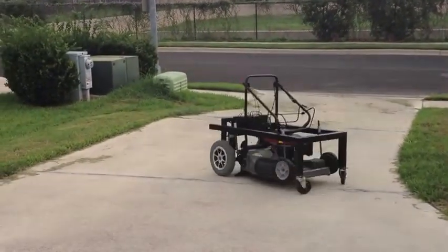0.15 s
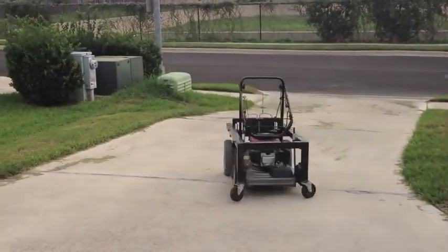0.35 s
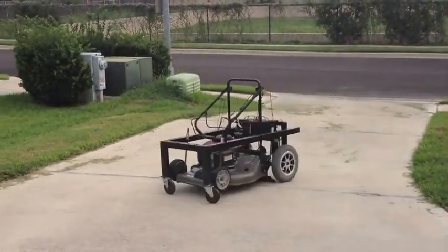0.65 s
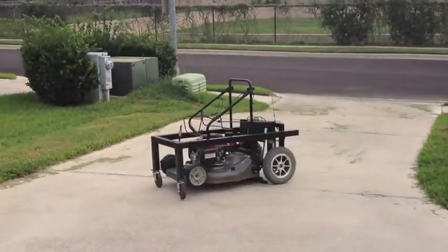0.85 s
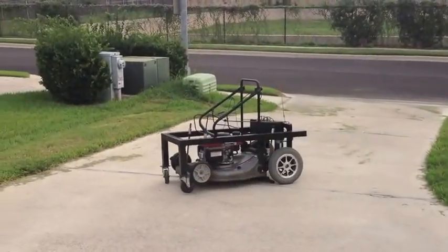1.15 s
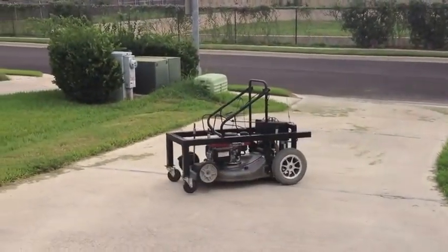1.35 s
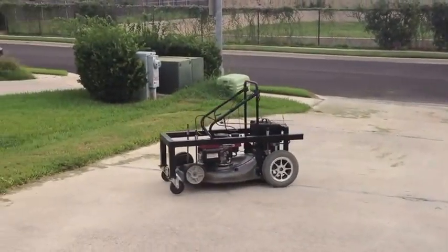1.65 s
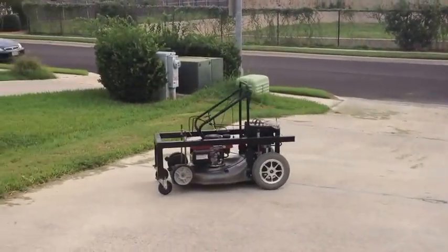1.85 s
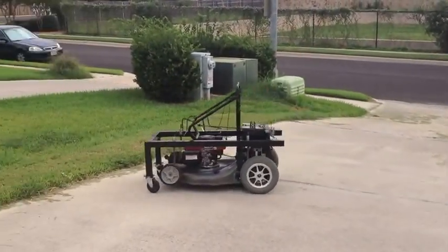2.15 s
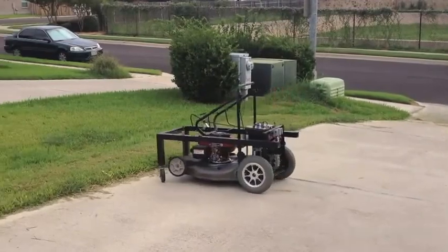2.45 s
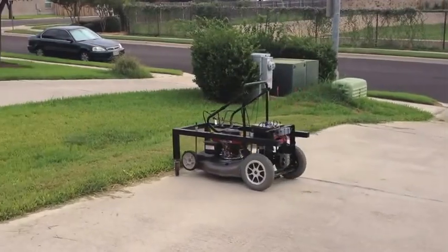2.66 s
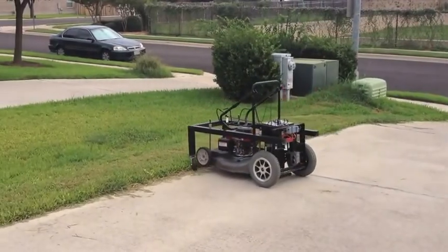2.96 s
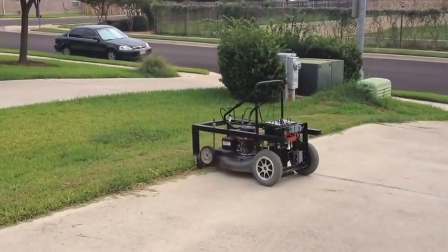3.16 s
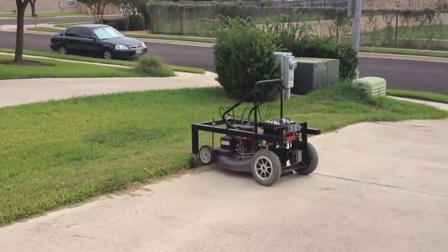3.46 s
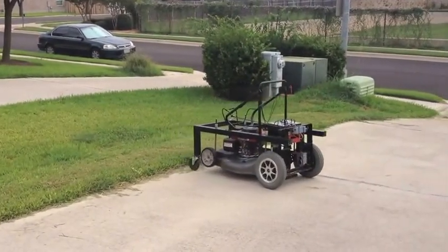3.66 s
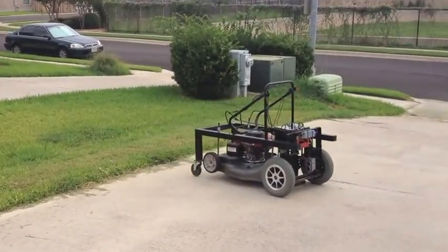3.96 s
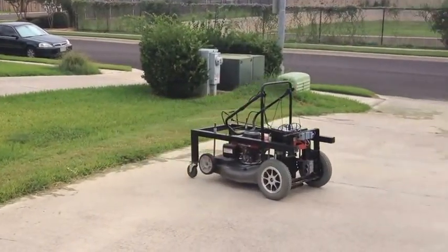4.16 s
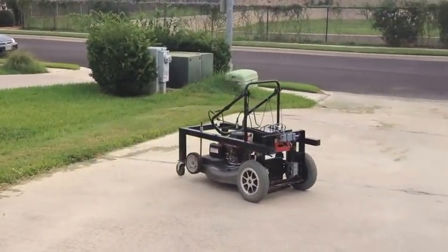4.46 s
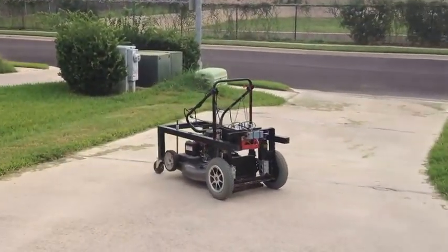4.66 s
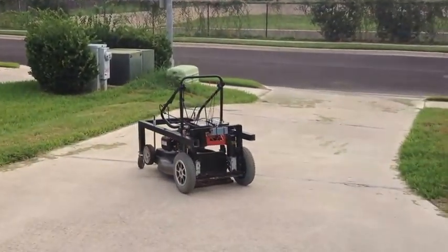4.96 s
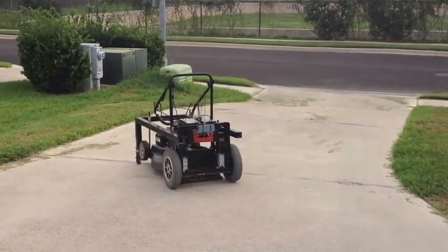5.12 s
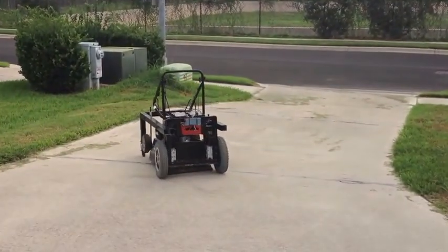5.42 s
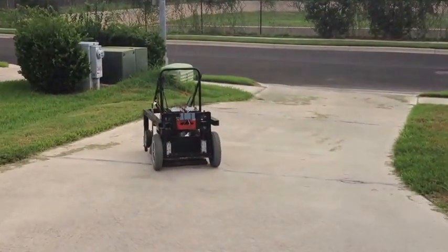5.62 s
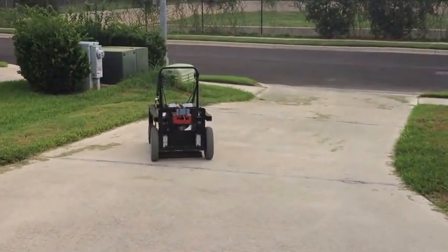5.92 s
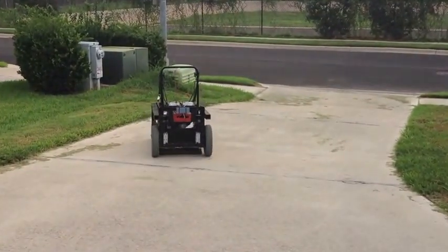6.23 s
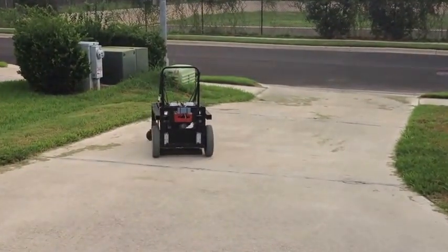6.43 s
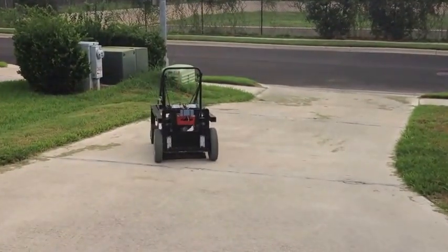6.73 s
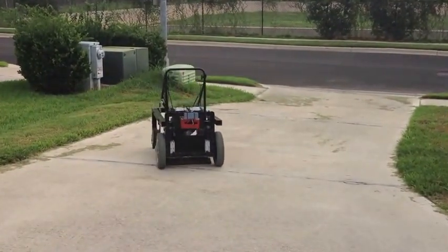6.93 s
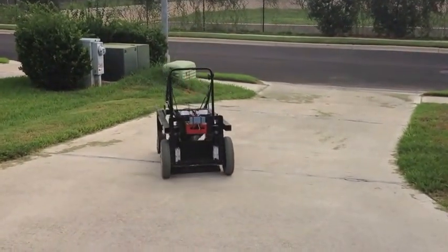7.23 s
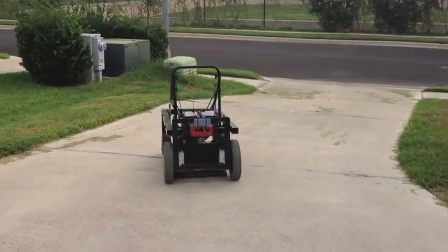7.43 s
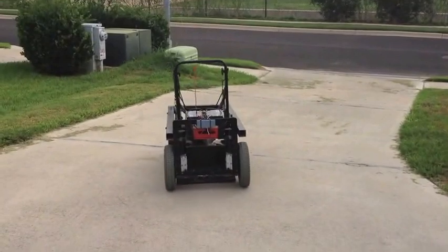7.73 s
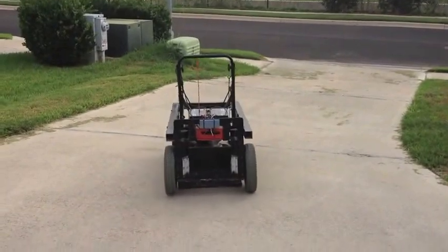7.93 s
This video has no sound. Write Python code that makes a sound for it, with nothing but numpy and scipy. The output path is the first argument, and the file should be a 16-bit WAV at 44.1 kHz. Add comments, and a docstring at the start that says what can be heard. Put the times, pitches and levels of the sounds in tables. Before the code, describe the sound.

A remote-controlled mower cart whirs and rattles over concrete, its steel frame clanking and its casters clacking as it speeds up and slows.

```python
"""Mower cart on a concrete driveway

A remote-controlled cart on two electric wheel motors drives, turns and backs up. The faster it runs,
the more the gears whir, the tyres drum on the deck and loose parts rattle. Jolts make the steel frame
clank and bounce, and the casters clack as it reverses. Behind it lies a quiet suburban hush;
a small camera microphone hollows out the treble."""
import sys
import numpy as np
from scipy import signal
from scipy.fft import rfft, irfft, next_fast_len
from scipy.io import wavfile
from scipy.ndimage import map_coordinates

SR = 44100
rng = np.random.default_rng(int(sys.argv[2]) if len(sys.argv) > 2 else 0)


def transcribe(u):
    """Save the signal u as a 16-bit wav file named by the first command-line argument.

    u: samples, shape (n,) or (channels, n), limited to [-1, 1]; the rate is SR.
    q: integer samples, one column per channel.
    """
    v = np.clip(np.atleast_2d(u).T, -1, 1)
    q = np.round(v * 32767).astype(np.int16)
    wavfile.write(sys.argv[1], SR, q)


N = 356548
RING_T = np.arange(SR // 2) / SR  # time within one hit, t/s

# how hard the cart drives: t/s, deck rumble/dB, treble of gears and loose parts/dB
DRIVE_LEVELS = [(0, -37, -34), (0.33, -36.5, -38.5), (0.46, -47.5, -57), (0.6, -46, -57), (0.76, -38, -47),
                (0.95, -59.5, -65.5), (1.35, -65, -62.5), (1.6, -55.5, -59.5), (2.1, -48.5, -55.5),
                (2.68, -51, -57.5), (2.85, -58.5, -70), (3.44, -63, -69), (3.6, -50, -53), (3.85, -45, -54),
                (4.55, -45, -47.5), (4.86, -52.5, -66), (5.12, -49.5, -63), (5.3, -47.5, -55),
                (5.55, -50.5, -59.5), (5.9, -45.5, -55.5), (6.2, -47.5, -51.5), (6.55, -37.5, -37),
                (6.76, -40, -50), (7.12, -49, -51.5), (7.58, -48.5, -53), (7.72, -48, -56.5),
                (8.08, -43, -44.5)]
# tone of the loose parts: f/Hz, level/dB
RATTLE_EQ = [(60, -59), (250, -43), (700, 3.5), (1100, -1.5), (1700, 11.5), (2100, 10.5), (2480, 11.5),
             (2750, 1), (3300, 9.5), (3900, 13.5), (6000, -5), (15000, -25.5)]
# washers shake on the fast runs: start/s, end/s, level/dB
WASHER_CUES = [(0.1, 0.38, -38), (6.35, 6.65, -35), (7.64, 7.68, -43.5)]
# tone of the washers: f/Hz, level/dB
WASHER_EQ = [(300, -50), (1500, -23), (3100, -25), (3700, 2), (3900, 1), (4200, -11.5), (5000, -14),
             (7500, -6.5), (10000, -20), (11800, -9.5), (14000, -21)]
def rolling():
    """Rough concrete drums the deck and shakes loose parts, the more the faster the cart runs."""
    rumble_db, treble_db = curves(DRIVE_LEVELS)
    lumps_db = 2 * wobble(20)  # slow swells in the rumble
    rumble = amp(rumble_db + 1.5 + lumps_db) * unit(deck(taps(per_s=500, scatter_db=6, crack_db=6)))
    pace_db = treble_db + 37  # about 0 on a fast run
    rattle = unit(coloured(taps(per_s=190, scatter_db=6, crack_db=8), RATTLE_EQ))
    washers = unit(coloured(taps(per_s=120, scatter_db=13, crack_db=2.5), WASHER_EQ))
    shaking = fades(WASHER_CUES, rise_db_per_s=260, fall_db_per_s=260)
    return rumble + amp(-34 + 1.002 * pace_db) * rattle + shaking * washers


# tone of the gears: f/Hz, level/dB
GEAR_EQ = [(40, -56), (300, -29), (900, -6.5), (1600, 16.5), (2400, -9), (2800, 5), (3700, 11), (6000, 2),
           (15000, -10.5)]
# thin, airy motor whine: start/s, end/s, level/dB
WHINE_CUES = [(3.7, 4.5, -64.5), (5.35, 5.95, -65.5), (6.8, 7.5, -60), (7.85, 8.08, -61.5)]
# a gearbox sings softly at creeping speed: start/s, end/s, level/dB
GEARBOX_CUES = [(0.75, 1.15, -54.5), (4.8, 5.0, -59)]
# the loaded motors drone in the deck: start/s, end/s, level/dB
HUM_CUES = [(1.48, 1.51, -47), (2.12, 2.18, -47), (2.52, 2.63, -45)]
def motors(hum_hz=229, hum_wander=0.029):
    """Gear noise rough with meshing teeth, a thin whine, a gearbox note and an unsteady hum under load."""
    _, treble_db = curves(DRIVE_LEVELS)
    whir_db = np.minimum(treble_db + 2, -47.5)  # tops out at full speed
    meshing = rng.standard_normal(N) * amp(3.8 * wobble(320))
    whir = amp(whir_db) * unit(coloured(meshing, GEAR_EQ))
    whine = fades(WHINE_CUES) * fuzzy_tone(hz=11700, width_hz=3400)
    gearbox = fades(GEARBOX_CUES) * fuzzy_tone(hz=1630, width_hz=380)
    flutter = amp(6.4 * wobble(25.3))
    hum_phase = 2 * np.pi * np.cumsum(hum_hz * (1 + hum_wander * wobble(40))) / SR
    hum = fades(HUM_CUES) * unit(flutter * np.sin(hum_phase))
    return whir + whine + gearbox + hum


# jolts to the frame: t/s, clank/dB, thud/dB, sharp edge/dB, small-part jangle/dB, loss per bounce/dB
JOLT_HITS = [(0.09, -6.5, -28, -18, -9.5, 17), (0.115, -6.5, -26.5, -13, -2.5, 4),
             (0.2097, -13.5, -30.5, -4, 2.5, 4.5), (0.3223, -11.5, -24, -14, -4.5, 13),
             (0.407, -22.5, -28.5, -15, 4.5, 18), (0.5532, -30, -35.5, -22, 0, 15),
             (0.599, -21.5, -41, -2, -8, 16), (0.6266, -8.5, -37, -12, -9, 10),
             (0.6362, -5.5, -27, -14, -5, 9), (0.7401, -19, -35.5, -28, 1, 11.5),
             (0.8272, -23.5, -40, -47, -2, 7), (1.2249, -20.5, -30.5, -24, -3.5, 20),
             (1.4402, -14.5, -31, -28, 1.5, 24), (2.4948, -33.5, -40, -27, -2, 8),
             (2.6187, -25, -36, -19, -4, 18), (2.673, -27.5, -50, -13, -2, 5.5),
             (2.906, -47.5, -59, -28, 6, 20), (4.0907, -30.5, -39, -15, -1, 5),
             (4.4251, -28.5, -35.5, -18, -1, 17), (4.5034, -11, -26, -19.5, 1.5, 5.5),
             (4.6555, -10, -25, -10, -2.5, 7), (5.238, -29.5, -39, -18, 0, 10),
             (5.2738, -26, -31.5, -14, -1, 16), (5.796, -29.5, -39.5, -12, -1, 20),
             (5.817, -27, -40, -12, 1.5, 12), (6.2507, -30, -35.5, -6, 6.5, 4),
             (6.329, -25, -32, -27, 7, 2.5), (6.4089, -33, -29, -14, 11, 8), (6.455, -29, -29, -5, 14, 3),
             (6.5611, -16.5, -27, -13, 2, 1), (6.6767, -20, -30.5, -30, -10, 20),
             (7.6491, -25, -30, -25, 9, 21), (7.687, -22, -26.5, -7, 0, 19),
             (7.7668, -23.5, -34, -11, 4.5, 7)]
def jolts(first_flight_s=0.035, flight_shrink=0.85):
    """The jolted frame lands three times, each bounce shorter and weaker; the casters barely ring."""
    out = np.zeros(N + SR)
    for t, clank_db, thud_db, edge_db, jangle_db, loss_db in JOLT_HITS:
        for bounce in range(3):
            hit = frame_hit(t, clank_db, thud_db, edge_db, jangle_db, caster_db=-11.5)
            add(out, t, amp(-loss_db * bounce) * hit)
            t += first_flight_s * flight_shrink ** bounce
    return out[:N]


# caster clacks, thickest while the cart backs up: t/s, clank/dB, thud/dB, treble/dB
CLACK_HITS = [(0.0478, -19, -46, -38), (2.0164, -40, -53, -66), (2.1422, -25.5, -43, -40),
              (2.1565, -21, -37, -33), (2.4319, -35.5, -57, -71), (2.7195, -30.5, -38, -49),
              (5.0511, -37.5, -50, -56), (5.77, -32.5, -38.5, -56), (6.8694, -32.5, -40, -47.5),
              (6.9445, -31, -37.5, -50), (6.9845, -31.5, -37.5, -57), (7.0523, -27.5, -39.5, -56),
              (7.1669, -32, -38.5, -46), (7.2208, -27, -36.5, -49), (7.2326, -28, -38, -45),
              (7.3092, -30.5, -40.5, -51), (7.3701, -32.5, -39, -46), (7.443, -26.5, -38, -48),
              (7.5373, -29.5, -37, -48), (7.551, -33, -35, -49), (7.6257, -25, -38, -46),
              (7.7378, -24.5, -37, -44), (7.7992, -26, -33.5, -48), (7.8204, -26, -35.5, -51),
              (7.886, -27.5, -40.5, -55), (7.9299, -27.5, -37, -59), (7.9597, -36, -42, -60),
              (8.0127, -26, -35, -54)]
def casters():
    """A caster fork clacks against its stop and rings, and the deck answers with a thud."""
    out = np.zeros(N + SR)
    for t, clank_db, thud_db, treble_db in CLACK_HITS:
        edge_db = treble_db - clank_db + 2
        add(out, t, frame_hit(t, clank_db, thud_db + 1.5, edge_db, jangle_db=-2.5, caster_db=-1))
    return out[:N]


# tone of struck steel: f/Hz, level/dB
STEEL_EQ = [(60, -66), (250, -38), (700, -9.5), (1100, -10), (1750, -1), (2100, -0.5), (2480, 1),
            (2750, -6.5), (3300, 1.5), (3900, 4.5), (6000, -12), (15000, -22.5)]
# ring of the steel frame: f/Hz, level/dB, t60/s
FRAME_MODES = [(1570, -12, .16), (1930, -1, .14), (2360, -3, .19), (2470, -1, .13), (2538, -1, .15),
               (3200, -7, .19), (3290, -6, .16), (3450, -2, .22), (3630, -4, .15), (3715, -5, .18),
               (3820, -4, .2), (4180, -3, .13), (4410, -7, .15), (6910, -15, .13), (7650, -18, .13),
               (8690, -18, .1)]
# ring of a caster fork: f/Hz, level/dB, t60/s
FORK_MODES = [(1622, 7.5, 0.024), (1718, -5, 0.12), (1726, 2, 0.16), (1800, -17, 0.097), (2477, -9, 0.046)]
def frame_hit(t, clank_db, thud_db, edge_db, jangle_db, caster_db, rebound_s=0.0039):
    """One contact and its chatter: the frame clanks, a fork rings, the deck thuds. Levels are relative."""
    times, rumble_db, _ = np.transpose(DRIVE_LEVELS)
    # a slow cart gives one clean clack, a fast one chatters
    chatter = np.clip((np.interp(t, times, rumble_db) + 55.5) / 14, .03, 1.5)
    swell = RING_T / rebound_s * np.exp(1 - RING_T / rebound_s)
    rebounds = rng.random(len(RING_T)) < 600 / SR
    contact = chatter * swell * rebounds * rng.uniform(-0.97, 1, len(RING_T))
    contact[0] = amp(-5.5)  # the first touch
    struck = lambda ring: unit(signal.fftconvolve(contact, ring)[:len(RING_T)])
    steel = struck(coloured(dense_ring(crack_db=4), STEEL_EQ))
    clean_crack = unit(coloured(burst(t60=0.016), STEEL_EQ))
    steel += amp(-9) * max(1 - chatter, 0) * clean_crack
    steel += amp(-6.5) * struck(chime(FRAME_MODES, scatter_db=4.5, detune=0.0025))
    steel += amp(caster_db) * struck(chime(FORK_MODES, scatter_db=3, detune=0.0096))
    top_db = 0.56 * (edge_db + 19)  # harder contact is brighter
    hit_eq = [(70, -28), (500, 0.5), (2800, -1.5), (3800, jangle_db), (5000, -0.5), (7000, top_db)]
    clank = coloured(steel, hit_eq)
    thud = unit(deck(dense_ring(crack_db=-36)))
    return amp(clank_db - 26) * clank + amp(thud_db - 16) * thud


# body of the mower deck: f/Hz, width/Hz, level/dB
DECK_MODES = [(185.6, 4.6, -2), (222, 46.5, 5), (327, 146, -4), (565.5, 123, -3), (648, 92, -10.5),
              (806, 350, -15)]
def deck(x, low_hz=142, high_hz=1300):
    """x through the resonances of the mower deck, which radiates little deep bass."""
    def response(f):
        modes = sum(amp(db) * 1j * f * width / (hz * hz - f * f + 1j * f * width)
                    for hz, width, db in DECK_MODES)
        return modes / (1 + 1j * f / high_hz)
    low_cut = signal.butter(3, low_hz, "high", fs=SR, output="sos")
    return signal.sosfilt(low_cut, filtered(x, response))


# how long the cart rings: f/Hz, t60/s
CART_DECAY = [(150, 0.15), (500, 0.22), (1100, 0.15), (3000, 0.35), (8000, 0.1), (15000, 0.17)]
def dense_ring(crack_db, crack_t60=0.066):
    """A crack, then countless close modes that die band by band; energy 1."""
    hz, t, spectrum = signal.stft(rng.standard_normal(len(RING_T)), SR, nperseg=256)
    decay = amp(-60 * t / along(CART_DECAY, hz)[:, None])
    tail = signal.istft(spectrum * decay, SR, nperseg=256)[1][:len(RING_T)]
    ring = tail * (1 + amp(crack_db - 60 * RING_T / crack_t60))
    return ring / np.linalg.norm(ring)


# a wheel drops into a joint or knocks on its axle: t/s, peak/dB
KNOCK_HITS = [(0.495, -24), (1.967, -34), (2.015, -38), (2.056, -31), (3.787, -36), (3.997, -36),
              (4.348, -35), (5.086, -30.5), (5.181, -33.5), (5.443, -32), (5.678, -26), (5.768, -32),
              (5.853, -34), (7.369, -37)]
# hollow tone of a wheel: f/Hz, level/dB
WHEEL_EQ = [(50, -48), (110, -18), (210, -0.5), (420, -17.5), (640, 3), (900, -12.5), (1500, -24.5),
            (3000, -33), (9000, -50)]
# grit snaps under a tyre: t/s, peak/dB
GRIT_HITS = [(1.2948, -29), (1.3013, -22.5), (1.545, -33), (1.656, -32), (4.608, -16.5), (5.3177, -24.5)]
def tyres():
    """Dull, hollow wheel knocks and the bright snaps of crushed grit."""
    out = np.zeros(N + SR)
    for t, db in KNOCK_HITS:
        knock = coloured(burst(t60=0.046) + .5 * burst(t60=0.035), WHEEL_EQ)
        add(out, t, amp(db) * knock / np.abs(knock).max())
    grit_eq = [(1500, -46), (3400, 0), (4400, 11), (5100, 10), (6500, -17.5), (14000, -21)]
    for t, db in GRIT_HITS:
        snap = coloured(burst(t60=0.0068) + 0.84 * burst(t60=0.028), grit_eq)
        add(out, t, amp(db) * snap / np.abs(snap).max())
    return out[:N]


# tone of the suburban bed: f/Hz, level/dB
STREET_EQ = [(25, -14), (60, -45), (110, 1.5), (170, 9.5), (290, -1), (460, -5), (620, 0), (1550, 3.5),
             (2500, -11.5), (4000, -27), (5300, -12.5), (7500, -20.5), (10000, -28), (15000, -15.5)]
def street():
    """The even hush of distant traffic and leaves."""
    return amp(-51.5 + 2.1 * wobble(3.42)) * unit(coloured(rng.standard_normal(N), STREET_EQ))


def taps(per_s, scatter_db, crack_db, parts=6):
    """Random small contacts, shared among several parts that each ring their own way."""
    out = np.zeros(N)
    for _ in range(parts):
        onsets = rng.random(N) < per_s / parts / SR
        strength = amp(scatter_db * rng.uniform(-0.85, 1, N))
        out += signal.oaconvolve(onsets * strength, dense_ring(crack_db))[:N]
    return unit(out)


def chime(modes, scatter_db, detune):
    """Modes struck at new strengths and pitches: loose parts sit a little differently each time."""
    hz, db, t60 = np.transpose(modes)[:, :, None]
    gain = amp(db + scatter_db * rng.standard_normal(hz.shape)) * rng.choice([-1, 1], hz.shape)
    hz = hz * (1 + detune * rng.standard_normal(hz.shape))
    decay = amp(-60 * RING_T / t60)
    return unit(np.sum(gain * decay * np.sin(2 * np.pi * hz * RING_T), axis=0))


def burst(t60):
    """A short noisy contact of energy 1."""
    x = rng.standard_normal(len(RING_T)) * amp(-60 * RING_T / t60)
    return x / np.linalg.norm(x)


def fuzzy_tone(hz, width_hz, wander=0.02):
    """A noise band of rms 1 whose pitch drifts."""
    phase = 2 * np.pi * np.cumsum(hz * (1 + wander * wobble(5.5))) / SR
    return unit(wobble(width_hz) * np.sin(phase) + wobble(width_hz) * np.cos(phase))


def fades(cues, rise_db_per_s=110, fall_db_per_s=83):
    """Gain that fades in, holds from start to end and fades out, once for each cue."""
    t = np.arange(N) / SR
    return sum(amp(db - rise_db_per_s * np.maximum(start - t, 0) - fall_db_per_s * np.maximum(t - end, 0))
               for start, end, db in cues)


def curves(rows):
    """One automation curve for each column after the time."""
    times, *columns = np.transpose(rows)
    return [np.interp(np.arange(N) / SR, times, column) for column in columns]


def wobble(per_s):
    """A smooth random curve with per_s knots a second."""
    knots = rng.standard_normal(int(N * per_s / SR) + 4)
    return map_coordinates(knots, [np.arange(N) * per_s / SR])


def coloured(x, eq, size=2048):
    """x through a minimum-phase filter that follows an EQ curve (f/Hz, level/dB)."""
    gain = amp(along(eq, np.fft.rfftfreq(size, 1 / SR)))
    cepstrum = irfft(np.log(gain))
    cepstrum[1:size // 2] *= 2
    cepstrum[size // 2 + 1:] = 0
    impulse = irfft(np.exp(rfft(cepstrum)))
    return signal.oaconvolve(x, impulse)[:len(x)]


def filtered(x, response):
    """x through a complex frequency response."""
    size = next_fast_len(len(x) + SR // 8, True)
    return irfft(rfft(x, size) * response(np.fft.rfftfreq(size, 1 / SR)), size)[:len(x)]


def along(points, hz):
    """(f/Hz, value) points read on a log frequency axis."""
    f, values = np.transpose(points)
    return np.interp(np.log(hz + 1), np.log(f + 1), values)


def add(out, t, sound):
    """Mix a sound into out from t seconds on."""
    out[round(t * SR):][:len(sound)] += sound


def amp(db):
    """Decibels to gain."""
    return 10 ** (np.asarray(db) / 20)


def unit(x):
    """x at rms 1."""
    return x / np.sqrt(np.mean(x ** 2) + 1e-20)


def scene():
    """The cart in the open air, in mono."""
    return (rolling() + motors() + jolts() + casters() + tyres() + street())[None]


# resonances and notches of the microphone port: f/Hz, level/dB
MIC_PORT_EQ = [(4000, -1.5), (4500, -4), (5300, -15.5), (6600, -0.5), (7900, 3), (9300, -2), (10100, -10.5),
               (11000, -2.5), (12000, 1), (13300, -5.5), (15200, -10.5)]
def record(dry):
    """The microphone port colours the treble, and the camera keeps nothing above its band limit."""
    return filtered(coloured(dry[0], MIC_PORT_EQ), lambda hz: hz < 15550)[None]


dry = scene()
out = record(dry)
transcribe(out)
```